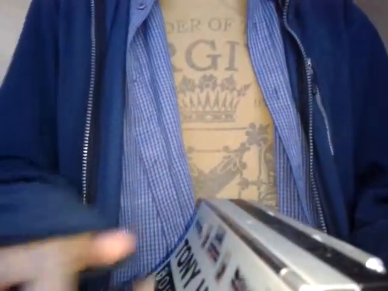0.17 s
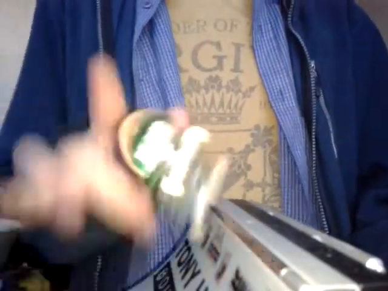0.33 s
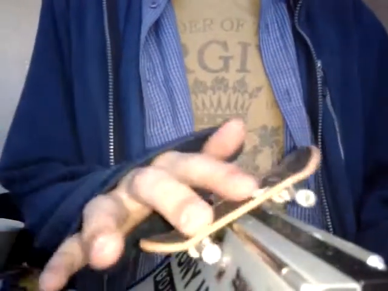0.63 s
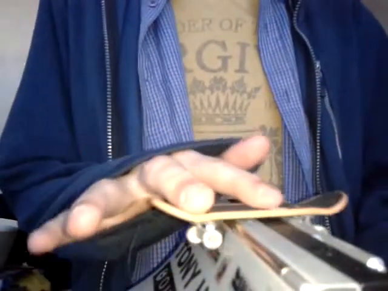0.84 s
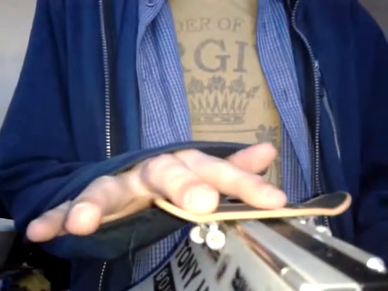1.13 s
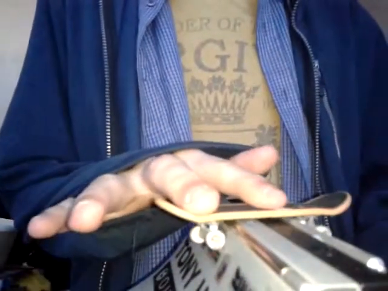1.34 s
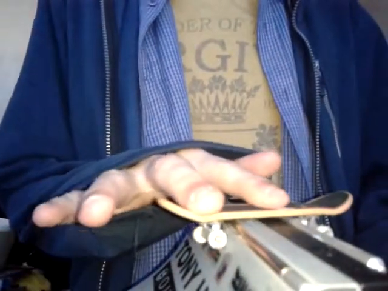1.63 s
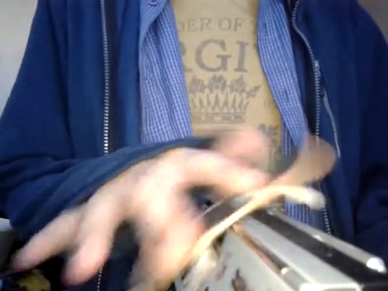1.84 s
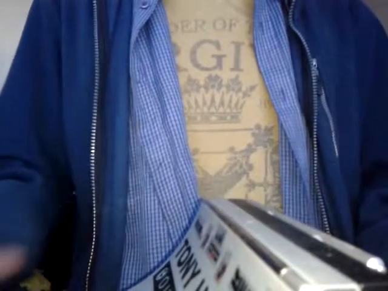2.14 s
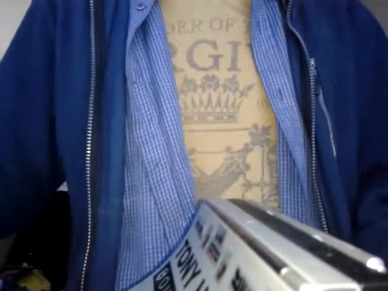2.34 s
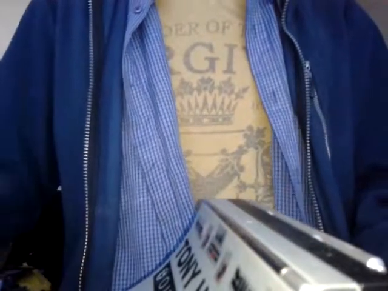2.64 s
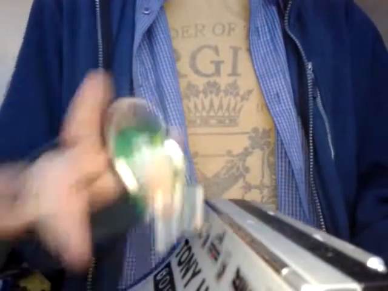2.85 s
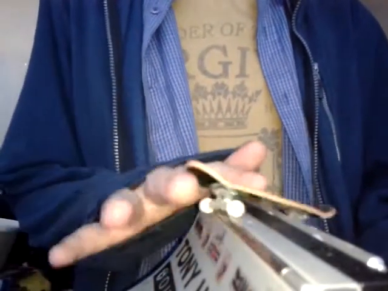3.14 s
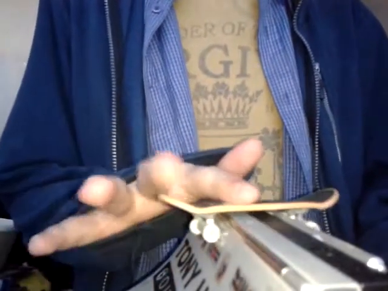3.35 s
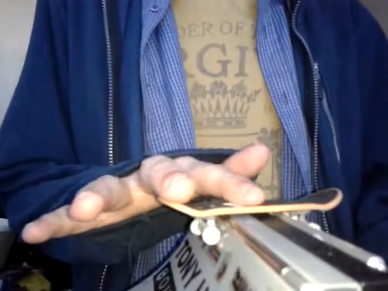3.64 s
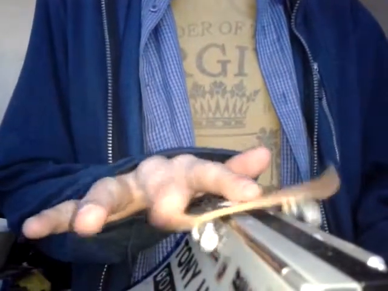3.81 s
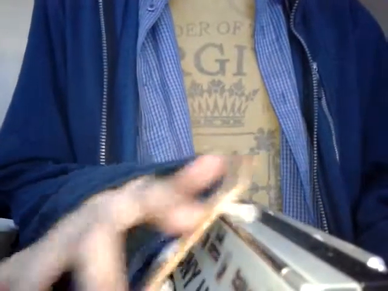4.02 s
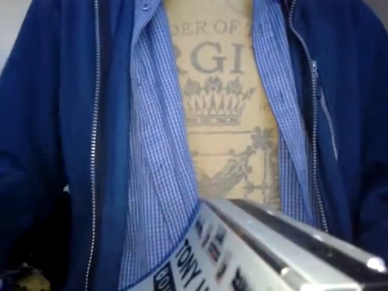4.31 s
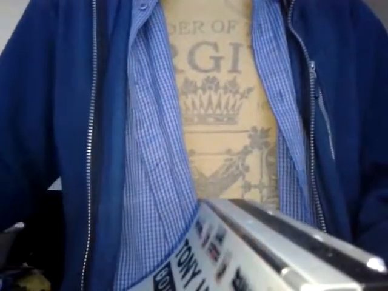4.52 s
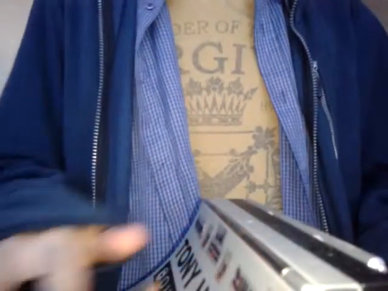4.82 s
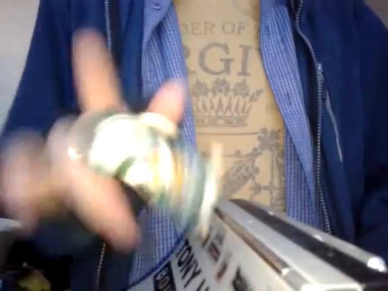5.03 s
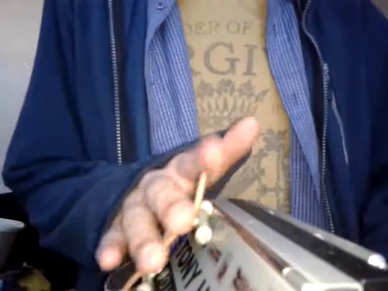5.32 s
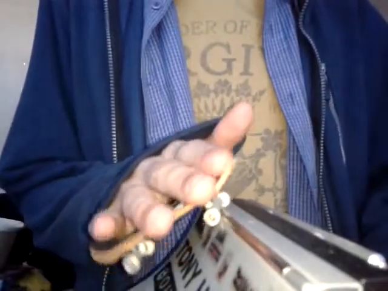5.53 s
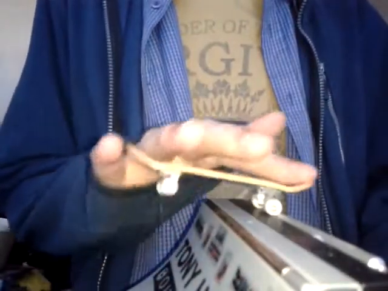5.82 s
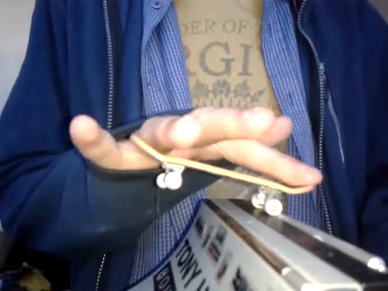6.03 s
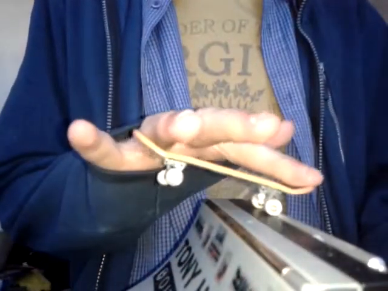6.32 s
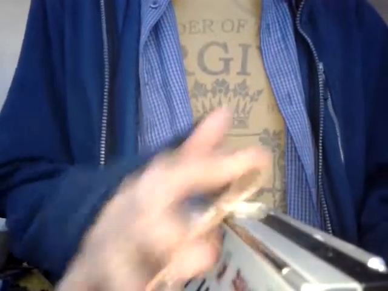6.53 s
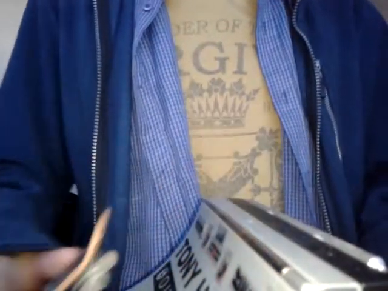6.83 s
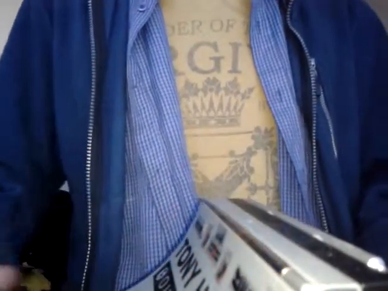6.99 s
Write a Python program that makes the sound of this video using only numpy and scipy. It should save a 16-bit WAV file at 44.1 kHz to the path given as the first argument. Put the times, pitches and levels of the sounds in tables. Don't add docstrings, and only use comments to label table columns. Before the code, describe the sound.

A toy skateboard's small hard wheels rumble in quick runs over a hollow ramp, with sharp clacks at the lip and near-quiet pauses between.

```python
import sys
import numpy as np
from scipy import signal
from scipy.fft import rfft, irfft, next_fast_len
from scipy.io import wavfile

SR = 44100
rng = np.random.default_rng(int(sys.argv[2]) if len(sys.argv) > 2 else 0)


def rack_gain(trim_db):
    fader = np.asarray(trim_db, float)
    return 10 ** (fader / 20)


def store_pcm(level_fs):
    pcm = np.round(np.clip(level_fs, -1, 1) * 32767).astype(np.int16)
    wavfile.write(sys.argv[1], SR, np.atleast_2d(pcm).T)


N = 315756

# pitch_hz, level_db, ring_s (time to fall 60 dB)
DESK = [(66, 1.5, 0.85), (104.6, 3.5, 0.25), (173, -0.5, 0.12), (197, -13, 0.19), (275.4, -7, 0.57),
        (302.4, 4.5, 0.18), (375.4, 13, 0.073)]
# pitch_hz, level_db, ring_s
RAMP = [(525, -2, .09), (610, -5, .08), (712, -3, .08), (824, 0, .07), (1003, -4, .06), (1315, -3, .05),
        (1450, -2, .05), (1560, -2, .05), (1700, -4, .05), (2030, -8, .03), (2230, -9, .03),
        (2420, -11, .025)]
# pitch_hz, level_db, ring_s
TRUCKS = [(3024, -6, 0.041), (3100, -35, .04), (3960, -25.5, 0.014), (4080, -19.5, .05), (5280, 14, 0.051),
          (5370, 16.5, 0.24), (6460, -0.5, 0.07), (5600, -3, 0.052), (7220, -8.5, 0.011), (8600, -7, 0.06),
          (9900, -13, 0.018)]
# pitch_hz, level_db, ring_s
LIP = [(3870, -5, .035), (4330, -5, .035), (4580, -9, .04), (5450, -9, .04), (5680, -12, .035),
       (6650, 0, .025), (7810, -4, .03), (8520, -2, .035), (9620, -12, .03), (11050, -11, .025),
       (12200, -18, .025), (13800, -20, .02)]
# pitch_hz, level_db (per Hz)
GRIT = [(1400, -31.5), (2500, -10), (3700, -8.5), (4100, -7.5), (7900, -12), (10000, -22.5), (12500, -28.5),
        (16000, -53.5)]
# pitch_hz, level_db (per Hz)
CRACK = [(1410, -32.5), (2400, -16), (3350, -1), (7590, 2.5), (8410, -1.5), (10300, -11.5), (14900, -16),
         (16000, -37.5)]
# pitch_hz, level_db (per Hz)
HUM = [(7.1, -26.5), (12, -7), (25, -17.5), (43, -28.5), (124, -28.5), (140, -23.5), (233, -25.5),
       (255, -35), (589, -37.5), (895, -43), (980, -44), (6090, -49), (15400, -52)]

# start_s, load_db (weight on wheels), speed_db (brightening), favoured_hz
CLIMB_1 = [
    (0, -33.5, -2.5, 600),
    (.06, -22.5, -3.5, 617.5),
    (.105, -23.5, 0.5, 674.5),
    (.22, -26.5, -3, 708),
    (.264, -29, -2.5, 757),
    (.32, -25, -0.5, 830),
    (.372, -29, 7, 815),
    (.431, -46, 11, 819),
    (.472, -64.5, -22, 802),
]
DROP_IN = [
    (1.83, -74, -6, 784),
    (1.87, -49, -6.5, 784),
    (1.905, -31, -9.5, 765),
    (1.935, -24, 1.5, 757),
    (1.985, -45.5, -23.5, 763),
]
DESCENT_1 = [
    (1.987, -41.5, -15, 782),
    (2.017, -23, 8.5, 764),
    (2.06, -23, 3, 726),
    (2.19, -24.5, -3, 694),
    (2.259, -18, 1, 641),
    (2.341, -24, 4, 680),
    (2.401, -28.5, -7, 822),
    (2.443, -46, -8, 783),
    (2.475, -44, -8, 667),
]
CLIMB_2 = [
    (2.475, -44.5, -13, 540),
    (2.519, -35, -11.5, 530),
    (2.568, -26.5, -5.5, 530),
    (2.65, -22, -2.5, 560),
    (2.771, -17, -1, 685),
    (2.86, -29.5, 8, 744),
    (2.916, -30.5, 4, 738),
    (2.957, -72, 7, 763),
    (3.007, -59.5, 6.5, 750),
]
TIP_IN = [
    (3.989, -58.5, -8.5, 756),
    (4.025, -30.5, -8.5, 789),
    (4.041, -27, -7, 760),
]
DESCENT_2 = [
    (4.044, -44, 10, 780),
    (4.059, -29, -11, 754),
    (4.119, -19, 1, 703.4),
    (4.249, -20.5, -5.5, 712),
    (4.33, -19, -3.5, 662.4),
    (4.4, -23, 0.5, 802),
    (4.451, -27, -3, 821),
    (4.5, -38.5, -10, 835),
    (4.544, -61, -2, 770),
]
CLIMB_3 = [
    (4.548, -52, 3, 757),
    (4.576, -40, 0, 602),
    (4.661, -24, -3.5, 647),
    (4.73, -24.5, 2, 692),
    (4.801, -21, 0, 722),
    (4.868, -23, -6, 644),
    (4.93, -29.5, -10.5, 702),
    (4.977, -26, -8.5, 814),
]
KICK = [
    (4.978, -28.5, -11.5, 875),
    (5.019, -19, 4, 851),
    (5.06, -36.5, 11.5, 832),
    (5.111, -62, 18, 815),
    (5.169, -57.5, 1.5, 812),
]
DESCENT_3 = [
    (6.73, -53, 3, 801),
    (6.755, -38.5, 8, 804),
    (6.801, -34.5, 0, 802),
    (6.86, -28.5, 0, 792),
    (6.92, -30.5, 3, 766),
    (6.975, -34.5, 4, 746),
    (7.005, -53, 11, 743),
    (7.07, -25.5, -10, 726),
    (7.16, -27.5, -1.5, 736),
]
# start_s, favoured_hz, strength_db
SKIN_PATCH = [
    [(0.0, 1685, -0.5), (0.178, 1615, 1), (0.28, 1494, -3), (0.344, 1680, -1.5), (0.388, 1450, 0.5),
     (0.44, 1498, -4), (0.47, 1650, -2)],
    [(1.85, 1370, 1), (2.102, 1597, -2.5), (2.218, 1411, -2.5), (2.254, 1566, 0.5), (2.47, 1442, -4)],
    [(2.48, 1407, 4), (2.62, 1690, -1.5), (2.742, 1550, -0.5), (2.784, 1700, -3.5), (2.806, 1563, -6.5),
     (2.962, 1472, -2), (3.0, 1720, 5.5)],
    [(3.99, 1556, -0.5), (4.07, 1520, 11.5), (4.102, 1670, 1), (4.27, 1768, -7.5), (4.296, 1582, -4.5),
     (4.368, 1450, 0.5), (4.54, 1565, 1.5)],
    [(4.55, 1687, 3), (4.622, 1553, 4.5), (4.792, 1784, -2.5), (4.822, 1548, -9.5), (4.926, 1498, 2.5),
     (4.97, 1690, 0)],
    [(4.98, 1620, 2.5), (5.022, 1738, -4), (5.078, 1568, -14.5), (5.112, 1900, -8), (5.17, 1828, 1)],
    [(6.73, 1818, 2), (6.872, 1613, -6.5), (6.942, 2015, -14), (6.996, 1542, -5), (7.058, 1558, -15),
     (7.088, 1807, 3), (7.16, 1559, 0)],
]
# start_s, length_s, load_db
SHIFTS = [
    (.515, 0.059, -28),
    (.76, 0.17, -80.5),
    (3.135, 0.21, -44),
    (3.393, 0.073, -66),
    (3.908, 0.036, -46),
    (5.33, 0.26, -53.5),
    (5.677, 0.13, -40.5),
]
# level_db (over the blow), ring_s
TREMBLE = [
    (-21.5, 0.18),
    (-35.5, 0.38),
    (-31, 0.15),
    (-31, 0.54),
]

# start_s, knock_db (peak), crack_db (over knock), knock_hz
SLAPS = [(.121, -0.5, -9.5, 670), (0.332, -7.5, -4, 947), (0.388, -8, -4.5, 758), (.571, 2.5, -5.5, 984),
         (0.603, -2, -8, 1430), (0.781, -24, -3, 1390), (2.022, 0.5, -12, 800), (2.138, -1, -2.5, 906),
         (2.211, -0.5, -5, 1300), (2.316, -21.5, -17.5, 1560), (2.589, -26.5, -8.5, 537),
         (2.621, -24, -9.5, 549), (4.674, -20.5, -12.5, 1510), (.312, -16.5, -6.5, 790),
         (2.03, -4, -12, 1000), (2.792, -7, -22, 700), (2.893, -6.5, -12.5, 1400), (3.942, -28, -14, 900),
         (0.893, -50, -21, 690), (2.717, -9.5, -10, 1664), (2.736, 1, -6, 838), (2.781, 0, -8.5, 641),
         (2.841, -7.5, -2.5, 820), (2.98, -37, 9, 1428), (5.182, -40, 16, 1406), (3.111, -12, 4, 1460),
         (3.307, -15, -4.5, 1500), (4.072, -12, -1.5, 1290), (4.087, -5.5, -10, 818), (4.209, 3.5, -8, 670),
         (4.28, -11.5, 4.5, 487), (4.291, -10, -23, 520), (5.2, 2, -4.5, 1188), (5.225, 3, -6, 985),
         (5.233, -3, -12, 1200), (5.7, -18.5, -4, 620), (6.594, -12, 2, 616), (6.744, -20.5, -10, 1030),
         (7.015, 2, -4.5, 1570), (7.098, -14, 5, 795)]
# start_s, knock_db, crack_db, knock_hz
DROPS = [(.18, -7, -6.5, 820), (0.191, -10, -9, 970), (0.521, -20, -1, 1223), (0.791, -22, -35, 493),
         (0.872, -25, -19, 1230), (1.619, -42, -17, 710), (1.882, -26, -22, 964), (1.945, -9.5, -3.5, 1490),
         (1.966, -17.5, -4, 633), (2.748, -2, -5.5, 797), (2.883, -16.5, 3.5, 1390),
         (3.232, -24.5, -35, 620), (3.261, -28.5, 1, 610), (3.43, -33, -26, 735), (3.886, -27, -13, 1320),
         (3.93, -25, -22, 517), (4.043, -9, 1.5, 840), (4.764, -4, -6, 710), (5.363, -25.5, -13.5, 640),
         (5.643, -30.5, -2, 775), (5.675, -38, 0.5, 785), (5.713, -24.5, -7, 529), (5.752, -13.5, -12, 750),
         (5.86, -42.5, -14.5, 612.5), (6.631, -5, -11, 1150), (6.769, -13.5, -6, 840),
         (6.948, -16.5, -25, 604)]
# start_s, knock_db, crack_db, knock_hz
CLATTERS = [(.139, -7.5, -27, 773), (.487, -9.5, -0.5, 935), (1.599, -43, -3, 1150), (2, -10, -8.5, 620),
            (3.018, -6, -3.5, 710), (3.049, -6, 0, 624), (3.296, -13, -6, 982), (3.527, -32, -16, 1440),
            (4.823, -4.5, -10, 816), (5.01, -20, -7.5, 824), (5.238, -7, -15, 692),
            (5.584, -33, -17.5, 511), (6.614, -3, -8.5, 1090), (6.641, -11, -5.5, 517),
            (6.937, -13.5, 9, 2000), (6.941, -7, -0.5, 2400), (7.126, -17, -31, 820)]
# thud_db (over knock), rattle_s
KINDS = [
    (-16, 0.049),
    (-4.5, 0.045),
    (-6.5, 0.06),
]
# start_s, peak_db
LIP_STRIKES = [(.121, -23), (.387, -8), (.487, -24.5), (.571, -14.5), (2.001, -23), (2.139, -23),
               (2.211, -16), (2.736, -17), (2.783, -20), (2.885, -11), (3.018, -5.5), (3.049, 3),
               (3.11, -5), (3.296, -46), (4.044, -34), (4.209, -14), (4.279, -20), (4.763, -18),
               (4.823, -15.5), (5.2, -10.5), (5.226, -15.5), (5.702, -15), (6.595, -37), (6.614, -12),
               (6.938, -11), (7.016, -3), (7.099, -14)]
# start_s, level_db
BUMPS = [(0.182, -24), (0.582, -16), (2.216, -33), (2.785, -22.5), (3.301, -32.5), (3.43, -40),
         (3.889, -36.5), (4.06, -39.5), (4.214, -32), (4.518, -61), (4.766, -24.5), (5.093, -45.5),
         (5.15, -39.5), (5.944, -56)]
# start_s, pitch_hz, level_db, ring_s
FREE_RINGS = [
    (0.573, 263.4, -3.5, 0.072),
    (.575, 983, -10.5, 0.05),
    (0.869, 1508, -37, 0.046),
    (.871, 537, -24.5, 0.052),
    (3.525, 1500, -22, 0.032),
    (3.527, 495, -28.5, 0.074),
    (3.937, 500, -30.5, 0.22),
    (5.018, 829, -16.5, 0.32),
    (6.519, 637, -48, 0.067),
    (6.615, 1026, 2, 0.031),
]
# start_s, peak_db, contact_ms
TICKS = [(0.927, -31, 0.51), (3.231, -19, 0.47), (3.454, -33, 0.17), (3.479, -33, 0.38),
         (3.508, -34.5, 0.15), (5.413, -22.5, 0.13), (5.422, -42, 0.094), (5.481, -17.5, 0.096),
         (5.55, -25.5, 0.24), (5.71, -16, 0.29), (5.755, -1.5, 0.11)]
# start_s, level_db
SWAYS = [
    (4.52, -44),
    (5.09, -57),
    (5.15, -44),
    (5.6, -41),
    (5.65, -52),
    (5.94, -55),
    (6.07, -52),
    (6.14, -52),
    (6.21, -55),
    (6.28, -58),
]

FAVOUR_DB, DECK_DAMPING, DECK_TOP_HZ = 19, 1.6, 1150
SKIN_FAVOUR_DB, SKIN_DAMPING, SKIN_TOP_HZ = 13, 2.0, 2600
BRACE_DB, UPPER_DB = -5.5, -5.5
GRIT_DB = -9.5
RUMBLE_DB, RUMBLE_FOLLOWS = -35, 0.93
REST_HZ = 620
SHIFT_FADE_DB_PER_S = 294.5
SHIFT_SKIN_DB, SHIFT_GRIT_DB, SHIFT_RUMBLE_DB = -10.5, -13.5, -6.5
SHIFT_PATCH_DB, SHIFT_PATCH_HZ = 4, 25
DESK_RISE_S = 0.014
SPREAD_DB, KNOCK_DAMPING, THUD_DAMPING = 2.4, 2.0, 1.25
KNOCK_FAVOUR_DB = 7
FIRST_TOUCH = 3.0
CRACK_RISE_S = 0.00021
TRUCK_DAMPING, TRUCK_SHARE = 4.5, .22
BODY_DB, BODY_LOW_HZ, BODY_HIGH_HZ = -2, 700, 2500
WOOD_TOP_HZ = 3200
BLOW_CUT_HZ = 140
LIP_SPREAD_DB, LIP_DAMPING, LIP_DETUNE = 5, 1.2, .03
BUMP_RISE_S, RING_RISE_S = .02, .003
TICK_LAG_S = 0.00135
TICK_TOP_HZ, TICK_KNOCK_DB = 3800, -8
SWAY_HZ, SWAY_S = 30, .07
HUM_DB = -55.5
ROOM_T60_S, ROOM_DB, WALL_CUT_HZ = 0.17, -18.5, 11000
OVERLOAD = .71


def rms_one(x):
    return x / np.sqrt(np.mean(x ** 2) + 1e-20)


def peak_one(x):
    return x / (np.abs(x).max() + 1e-12)


def butter(x, order, hz, kind):
    return signal.sosfilt(signal.butter(order, hz, kind, fs=SR, output="sos"), x)


def band(x, low_hz, high_hz):
    return rms_one(butter(x, 2, [low_hz, high_hz], "band"))


def coloured(x, spectrum):
    hz, level_db = np.transpose(spectrum)
    grid = np.arange(len(x) // 2 + 1) * SR / len(x) + 1
    gain = rack_gain(np.interp(np.log(grid), np.log(hz), level_db))
    return irfft(rfft(x) * gain, len(x))


def drift(rate_hz):
    r = np.exp(-64 * np.pi * rate_hz / SR)
    noise = rng.standard_normal(N // 32 + 1002)
    slow = signal.lfilter([1], [1, -2 * r, r * r], noise)[1000:]
    return np.interp(np.arange(N) / 32, np.arange(len(slow)), rms_one(slow))


def ringing(modes, damping, detune=1):
    hz, level_db, t60 = np.transpose(modes)[:, :, None]
    t = np.arange(SR // 5) / SR
    fade = np.exp(-np.log(1000) * t * damping / t60)
    return rack_gain(level_db) * fade * np.sin(2 * np.pi * hz * detune * t)


def favour(hz, best_hz, slope_db):
    return rack_gain(-slope_db * np.abs(np.log2(hz / best_hz)))


def all_blows():
    kinds = zip((SLAPS, DROPS, CLATTERS), KINDS)
    return sorted((*row, *kind) for rows, kind in kinds for row in rows)


def shaking():
    t = np.arange(N) / SR
    power = np.zeros((4, N))
    place_hz = np.full(N, float(REST_HZ))
    for stroke in (CLIMB_1, DROP_IN, DESCENT_1, CLIMB_2, TIP_IN, DESCENT_2, CLIMB_3, KICK, DESCENT_3):
        s, *columns = np.transpose(stroke)
        on = slice(round(s[0] * SR), round(s[-1] * SR))
        load_db, speed_db, place_hz[on] = (np.interp(t[on], s, c) for c in columns)
        rumble_db = RUMBLE_DB + RUMBLE_FOLLOWS * (load_db + 22.0)
        layers_db = [load_db, load_db + speed_db, load_db + GRIT_DB + speed_db, rumble_db]
        power[:, on] = rack_gain(2 * np.array(layers_db))
    patch_db = SHIFT_PATCH_DB * drift(SHIFT_PATCH_HZ)
    shift_layers_db = np.array([[0], [SHIFT_SKIN_DB], [SHIFT_GRIT_DB], [SHIFT_RUMBLE_DB]])
    for s, length, load_db in SHIFTS:
        outside_s = np.maximum(0, np.abs(t - s - length / 2) - length / 2)
        shift_db = load_db + patch_db - SHIFT_FADE_DB_PER_S * outside_s
        power += rack_gain(2 * shift_db) * rack_gain(2 * shift_layers_db)
    struck = np.full(N, 1e-18)
    for s, knock_db, *_ in all_blows():
        struck[round(s * SR)] = rack_gain(2 * knock_db)
    for layer, (level_db, t60) in zip(power, TREMBLE):
        layer += rack_gain(2 * level_db) * signal.lfilter([1], [1, -rack_gain(-120 / (t60 * SR))], struck)
    lag = np.exp(-1 / (DESK_RISE_S * SR))
    power[3] = signal.lfilter([1 - lag], [1, -lag], power[3])
    return (*np.sqrt(power), place_hz)


def rolling():
    deck, skin, grit, rumble, place_hz = shaking()
    s, patch_hz, patch_db = np.transpose(np.concatenate(SKIN_PATCH))
    patch_hz, patch_db = (np.interp(np.arange(N) / SR, s, c) for c in (patch_hz, patch_db))
    sizes = rack_gain(1.8 * np.minimum(rng.exponential(1, N), 5)) * rng.choice([-1, 1], N)
    hits = rng.random(N) < 8000 / SR
    bumps = sizes * hits * rack_gain(2.2 * drift(30) + 1.5 * drift(120))

    def wander():
        return rack_gain(2.5 * drift(25))

    def shake(modes, damping):
        return [signal.oaconvolve(bumps * wander() * rng.choice([-1, 1], N), ring[:SR // 8])[:N]
                for ring in ringing(modes, damping)]

    def favoured(modes, damping, best_hz, slope_db):
        weights = np.array([favour(hz, best_hz, slope_db) for hz, level_db, t60 in modes])
        return np.sum(shake(modes, damping) * weights, axis=0) / np.sqrt(np.sum(weights ** 2, axis=0))

    low = favoured(RAMP[:5], DECK_DAMPING, place_hz, FAVOUR_DB)
    out = band(low, 320, DECK_TOP_HZ) * deck
    high = favoured(RAMP[5:10], SKIN_DAMPING, patch_hz, SKIN_FAVOUR_DB)
    out += band(high, 840, SKIN_TOP_HZ) * skin * rack_gain(patch_db)
    out += band(bumps, 1200, 2800) * np.sqrt(skin * grit) * rack_gain(-1.5)
    brace = shake(RAMP[4:5], DECK_DAMPING)[0]
    out += band(brace, 850, 1200) * np.sqrt(deck * skin) * rack_gain(BRACE_DB)
    upper = sum(shake(RAMP[9:], SKIN_DAMPING))
    out += band(upper, 1850, 2200) * np.sqrt(skin * grit) * rack_gain(UPPER_DB)
    hiss = coloured(bumps + 2.6 * rng.standard_normal(N) * wander(), GRIT)
    out += rms_one(hiss) * grit
    return out + band(sum(shake(DESK, 1.2)), 100, 600) * rumble


def room_hum():
    return rack_gain(HUM_DB) * rms_one(coloured(rng.standard_normal(N), HUM))


def room(x):
    size = next_fast_len(N + SR)
    w = 2 * np.pi * np.arange(size // 2 + 1) / size
    dull = 1 / (1 + 1j * w * SR / (2 * np.pi * WALL_CUT_HZ))
    echoes = 0
    for k, lag_s in enumerate([.0091, .0113, .0137, .0163, .0181, .0209, .0233, .0271, .0299, .0331]):
        loop = rack_gain(-60 * lag_s / ROOM_T60_S) * dull * np.exp(-1j * w * lag_s * SR)
        echoes = echoes + (-1) ** k * loop / (1 - loop)
    return irfft(rfft(x, size) * echoes, size)[:N]


def blows():
    size = SR // 5
    out, t = np.zeros(N + SR), np.arange(size) / SR
    end_fade = np.minimum(1, 8 * (1 - t / t[-1]))
    ramp_hz = np.array(RAMP)[:, 0]

    def strike(rattle, modes, damping, weights=1):
        strength = weights * rack_gain(SPREAD_DB * rng.standard_normal(len(modes)))
        rings = ringing(modes, damping, rng.normal(1, 0.056, (len(modes), 1)))
        return peak_one(signal.fftconvolve(rattle, strength @ rings)[:size])

    for s, knock_db, crack_db, knock_hz, thud_db, rattle_s in all_blows():
        noise = rng.standard_normal(size)
        rattle = noise * np.abs(noise) * rack_gain(-60 * t / rattle_s)
        rattle[0] = FIRST_TOUCH
        hiss_fade = rack_gain(-60 * t / (0.35 * rattle_s + 0.005)) + rack_gain(-11.5 - 60 * t / 0.21)
        hiss = coloured(rng.standard_normal(size), CRACK) * (1 - np.exp(-t / CRACK_RISE_S)) * hiss_fade
        crack = peak_one(peak_one(hiss) + TRUCK_SHARE * strike(rattle, TRUCKS, TRUCK_DAMPING))
        body = peak_one(band(rattle * rack_gain(-60 * t / 0.023), BODY_LOW_HZ, BODY_HIGH_HZ))
        knock = strike(rattle, RAMP, KNOCK_DAMPING, favour(ramp_hz, knock_hz, KNOCK_FAVOUR_DB))
        wood = butter(knock + rack_gain(BODY_DB) * body, 2, WOOD_TOP_HZ, "low")
        thud = strike(rattle, DESK, THUD_DAMPING)
        hit = wood + rack_gain(thud_db) * thud + rack_gain(crack_db) * crack
        at = round(s * SR)
        out[at:at + size] += rack_gain(knock_db) * hit * end_fade
    return butter(out[:N], 2, BLOW_CUT_HZ, "high")


def lip_rings():
    out = np.zeros(N + SR)
    for s, peak_db in LIP_STRIKES:
        strength = rack_gain(LIP_SPREAD_DB * rng.standard_normal(len(LIP)))
        rings = ringing(LIP, LIP_DAMPING, rng.normal(1, LIP_DETUNE, (len(LIP), 1)))
        out[round(s * SR):][:SR // 5] += rack_gain(peak_db) * peak_one(strength @ rings)
    return out[:N]


def after_rings():
    out, t = np.zeros(N + SR), np.arange(SR // 5) / SR
    end_fade = 1 - t / t[-1]
    boom = peak_one(ringing(DESK[1:2], 2.2)[0] * (1 - np.exp(-t / BUMP_RISE_S)) * end_fade)
    for s, level_db in BUMPS:
        out[round(s * SR):][:len(t)] += rack_gain(level_db) * boom
    for s, *mode in FREE_RINGS:
        ring = ringing([mode], 1)[0] * np.minimum(1, t / RING_RISE_S) * end_fade
        out[round(s * SR):][:len(t)] += ring
    return out[:N]


def ticks():
    out, t = np.zeros(N + SR), np.arange(SR // 10) / SR
    knock = peak_one(ringing(DESK[3:] + RAMP[:8], 1.7).sum(axis=0)[:len(t)])
    for s, peak_db, contact_ms in TICKS:
        steps = 1000 * t / contact_ms
        rebound = 0.2 * steps / 4 * np.exp(-steps / 4)
        push = peak_one(steps * np.exp(-steps) - rebound)
        at = round((s + TICK_LAG_S) * SR)
        out[at:at + len(t)] += rack_gain(peak_db) * (push + rack_gain(TICK_KNOCK_DB) * knock)
    return butter(out[:N] + 1e-18, 2, TICK_TOP_HZ, "low")


def sways():
    t = np.arange(N) / SR
    out = np.zeros(N)
    for s, level_db in SWAYS:
        swell = np.sin(np.pi * np.clip((t - s) / SWAY_S, 0, 1)) ** 2
        out += rack_gain(level_db) * np.sin(2 * np.pi * SWAY_HZ * (t - s)) * swell
    return out


def scene():
    board = butter(rolling() + blows() + ticks(), 3, 70, "high")
    mix = board + room_hum() + rack_gain(ROOM_DB) * room(board)
    return (mix + lip_rings() + after_rings() + sways())[None]


def roll_off(x):
    return signal.sosfilt(signal.butter(12, 16830, fs=SR, output="sos"), x)


def record(dry):
    flat = dry / (1 + np.abs(dry / OVERLOAD) ** 12) ** (1 / 12)
    mix = signal.sosfilt(signal.cheby2(10, 35, 16700, fs=SR, output="sos"), flat)
    return roll_off(mix)


dry = scene()
out = record(dry)
store_pcm(out)
```